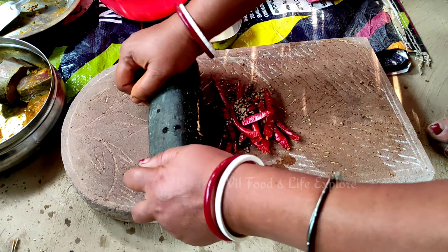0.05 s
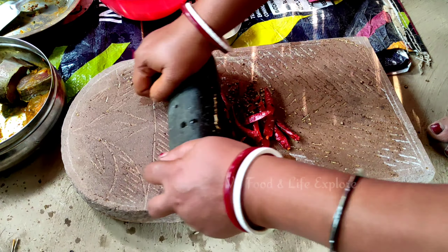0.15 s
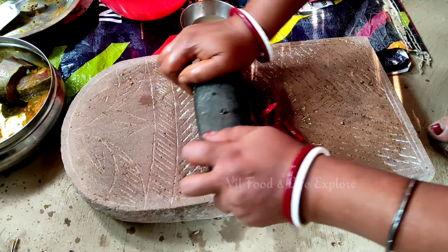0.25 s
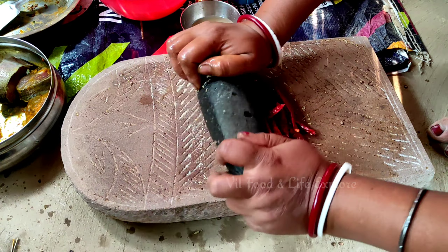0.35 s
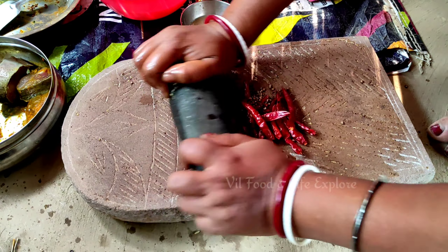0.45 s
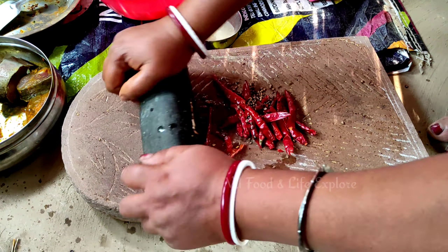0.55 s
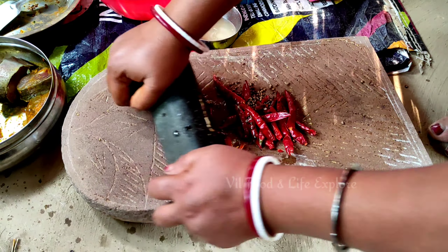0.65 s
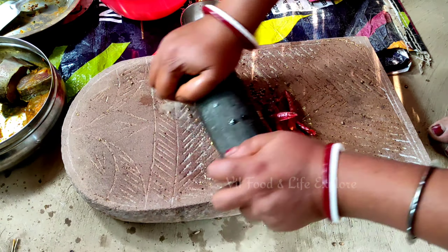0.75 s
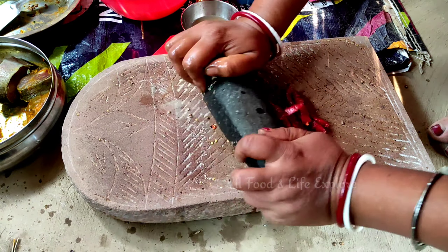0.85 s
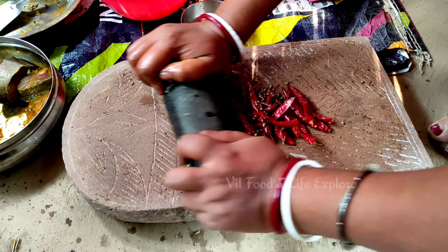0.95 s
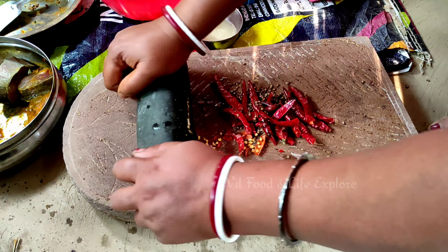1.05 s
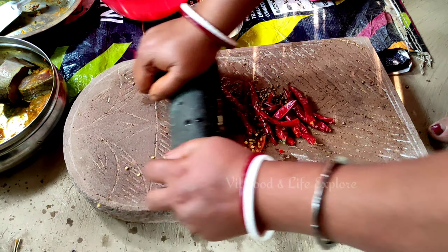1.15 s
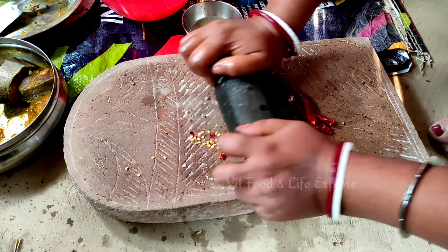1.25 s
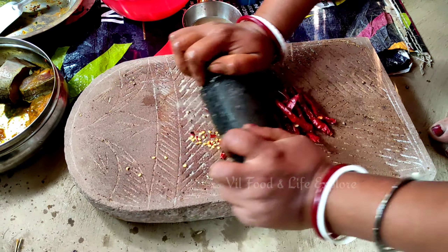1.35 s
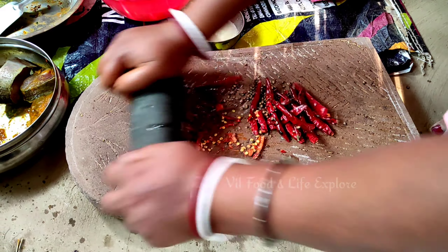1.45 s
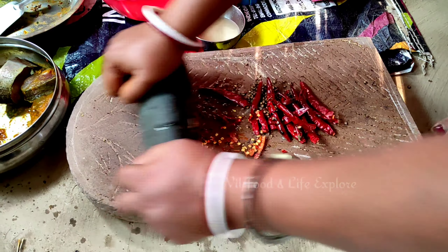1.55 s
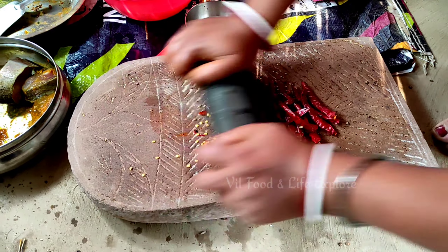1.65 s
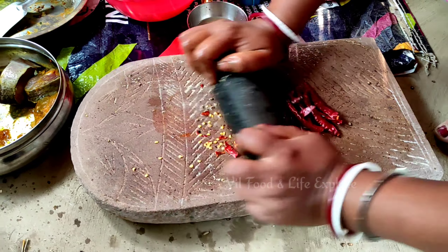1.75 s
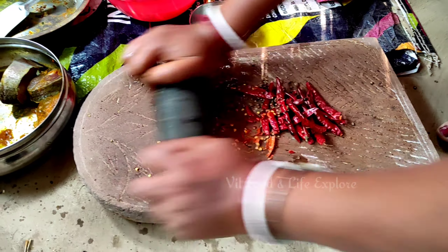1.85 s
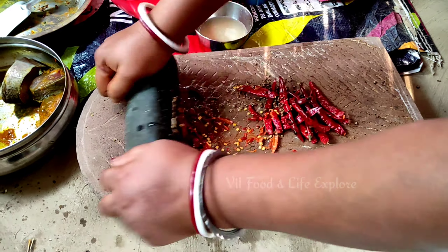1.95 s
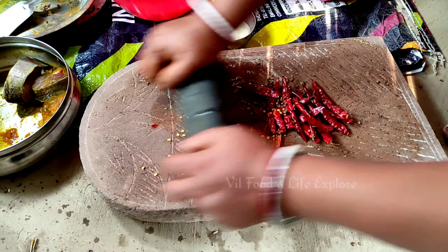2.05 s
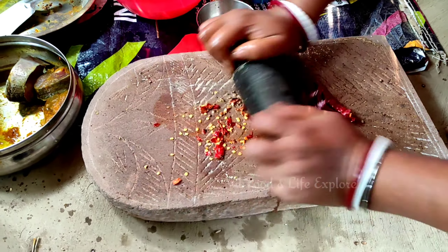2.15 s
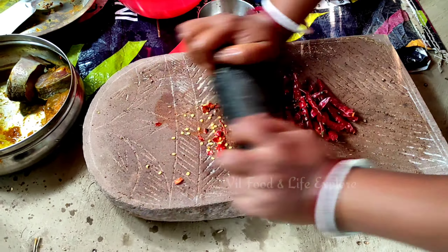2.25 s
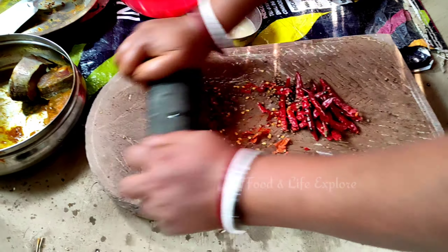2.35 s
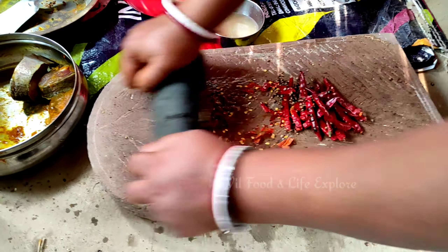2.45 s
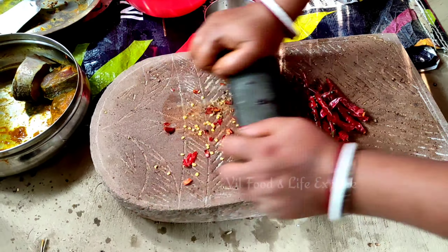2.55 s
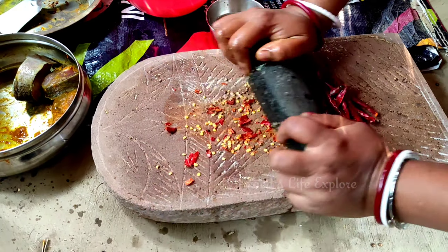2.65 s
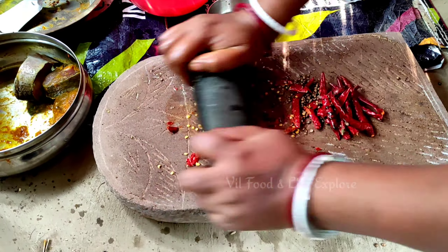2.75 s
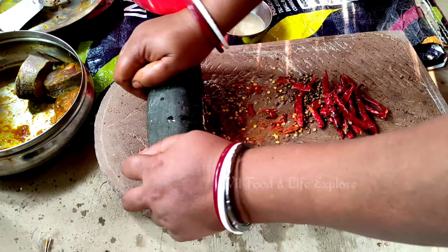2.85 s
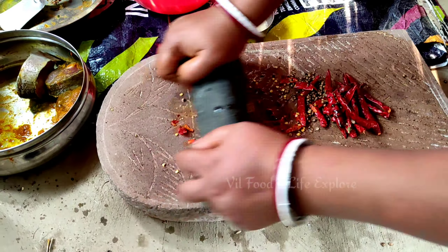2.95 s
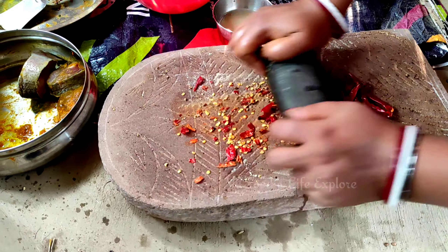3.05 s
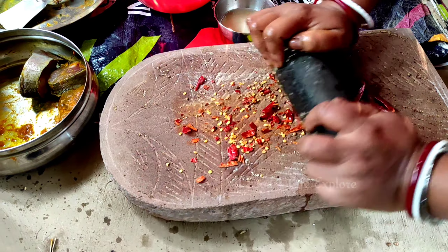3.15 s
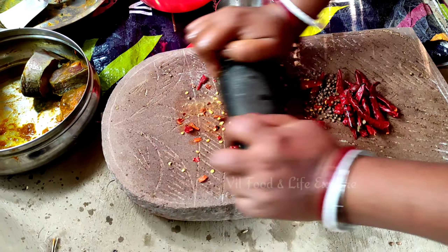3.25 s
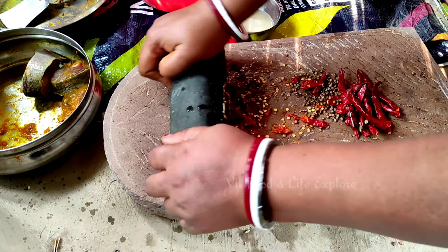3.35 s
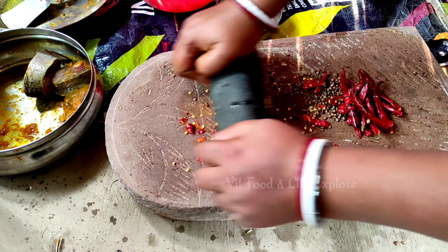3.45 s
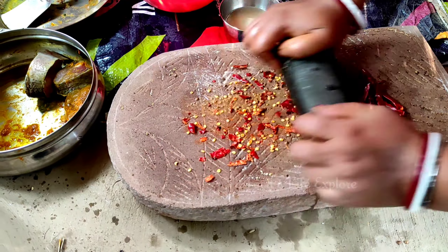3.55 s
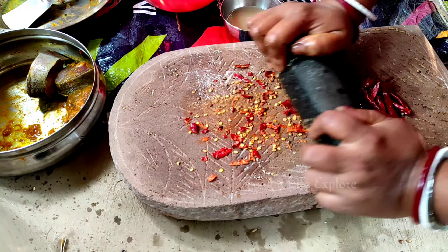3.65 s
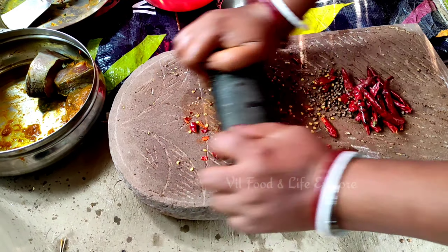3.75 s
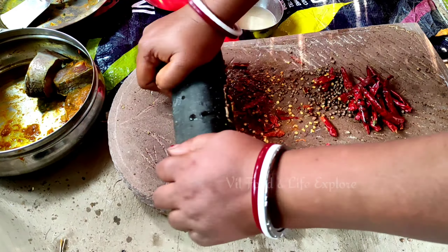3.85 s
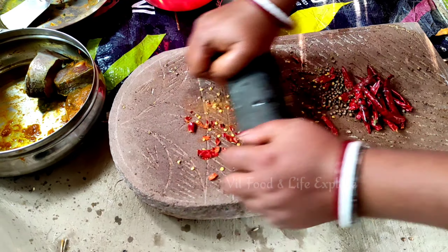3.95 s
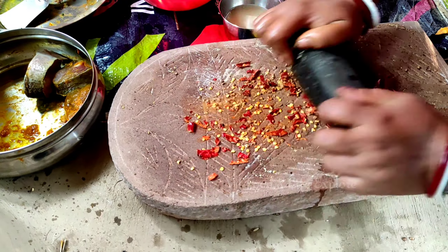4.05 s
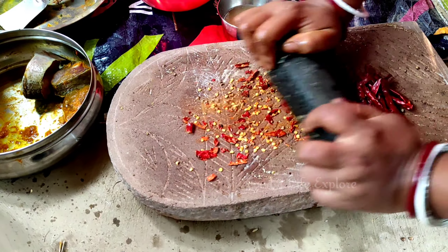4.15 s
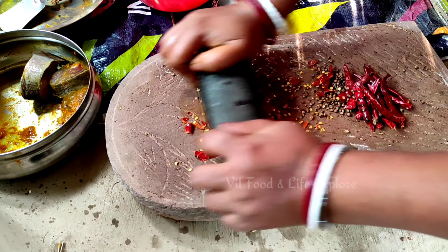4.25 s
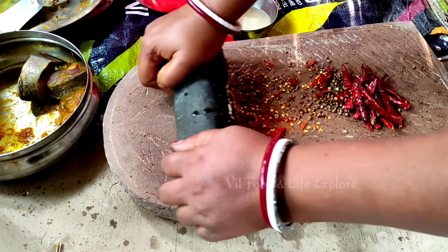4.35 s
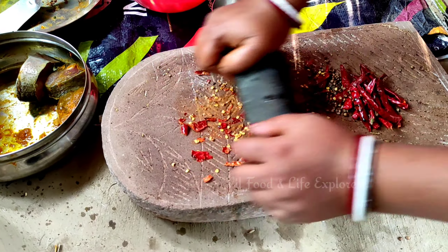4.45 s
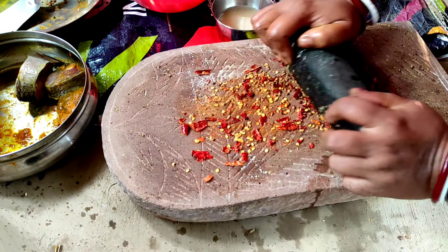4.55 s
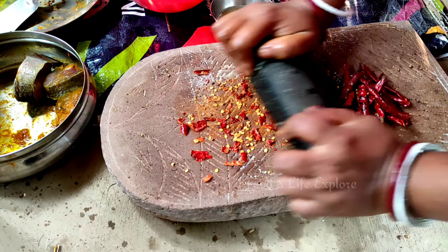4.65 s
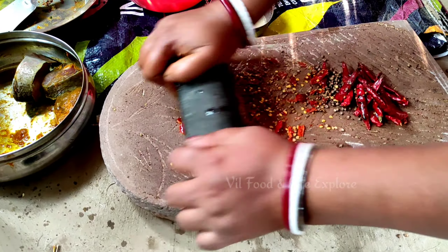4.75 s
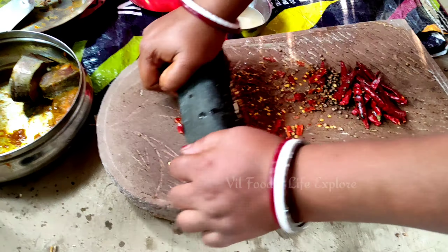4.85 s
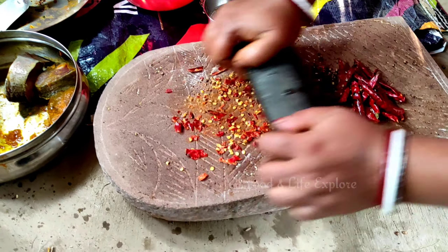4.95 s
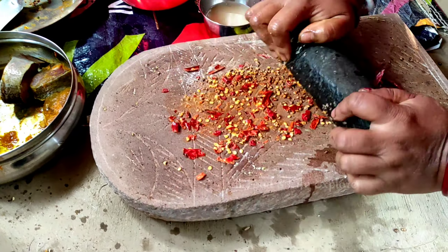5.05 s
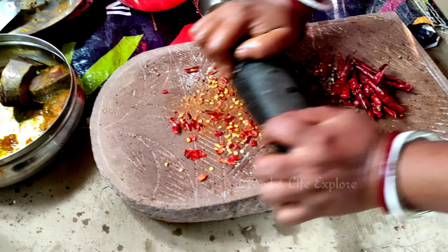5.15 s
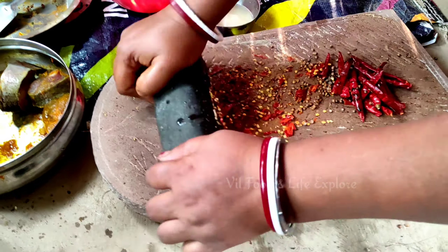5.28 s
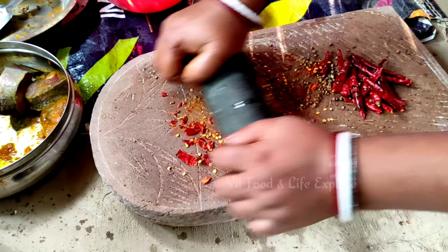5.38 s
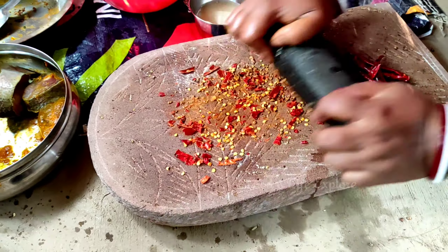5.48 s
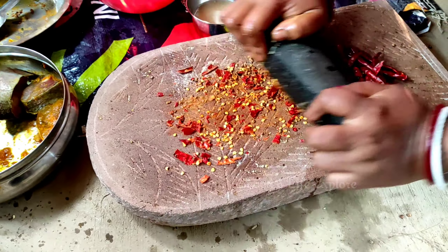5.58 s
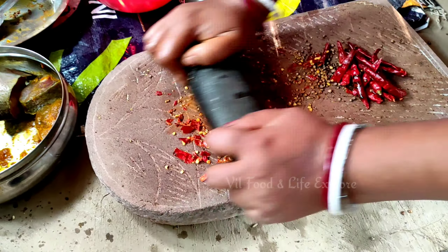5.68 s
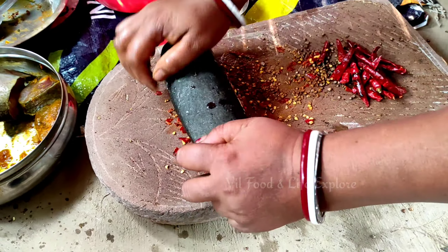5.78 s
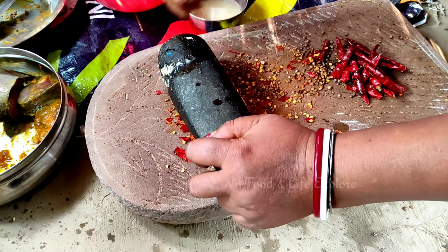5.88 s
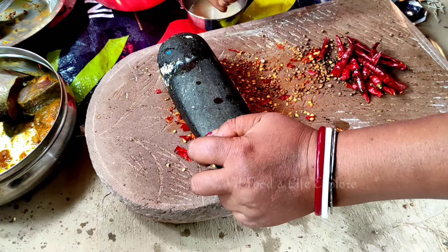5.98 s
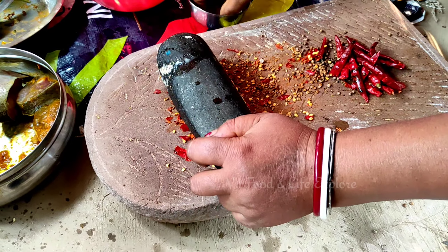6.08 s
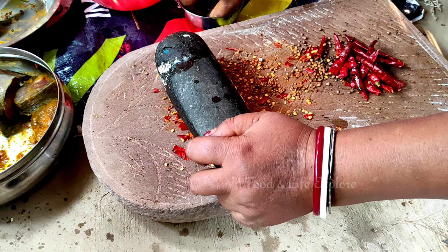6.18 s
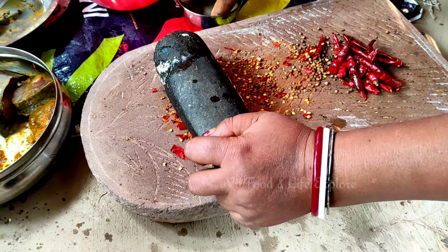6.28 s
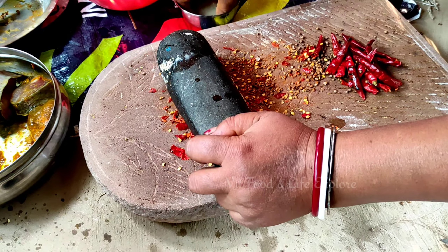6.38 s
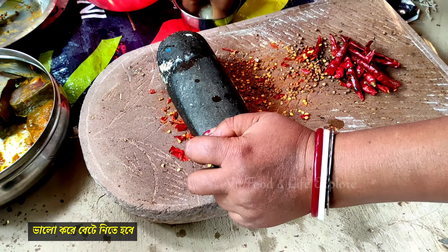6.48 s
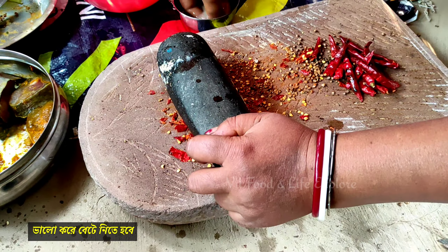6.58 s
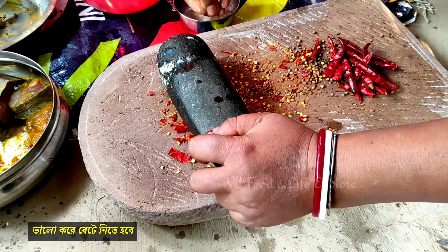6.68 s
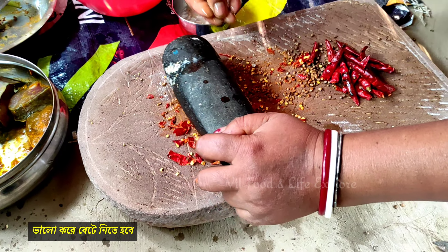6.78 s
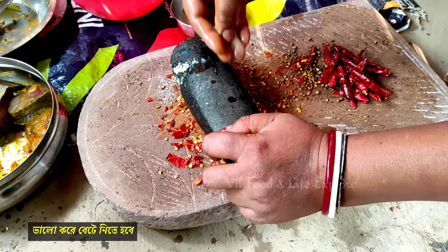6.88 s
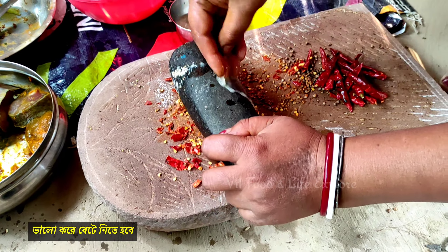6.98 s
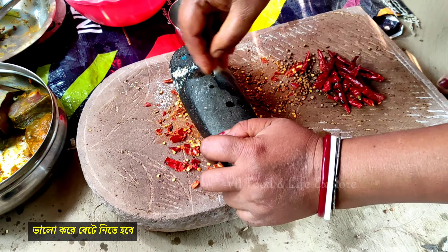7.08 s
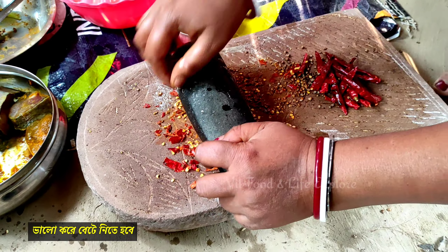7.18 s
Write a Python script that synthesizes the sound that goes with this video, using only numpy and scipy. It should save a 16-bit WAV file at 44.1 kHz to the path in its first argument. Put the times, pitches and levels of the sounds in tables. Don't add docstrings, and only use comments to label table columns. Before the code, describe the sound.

A stone roller scrapes and crackles back and forth over brittle pods on a slab, bangles clicking, until the quiet yard takes over with small wet sounds.

```python
import sys
import numpy as np
from scipy import signal
from scipy.fft import rfft, irfft
from scipy.io import wavfile
from scipy.ndimage import uniform_filter1d

SR = 44100
rng = np.random.default_rng(int(sys.argv[2]) if len(sys.argv) > 2 else 0)


def wrap_up_sound(samples):
    columns = np.atleast_2d(samples).T
    tamed = np.clip(columns, -1, 1)
    steps = np.round(tamed * 32767).astype(np.int16)
    wavfile.write(sys.argv[1], SR, steps)


def ratio_of_db(decibels):
    return 10 ** (np.asarray(decibels, float) / 20)


N = 318402
T = np.arange(N) / SR


def level(x):
    return x / np.sqrt(np.mean(x ** 2))


def colour(x, points, share=1):
    hz, db = np.transpose(points)
    grid = np.log(np.arange(1025) * SR / 2048 + 1)
    log_gain = share * np.interp(grid, np.log(hz), db) * np.log(10) / 20
    cepstrum = irfft(log_gain)
    cepstrum[1:1024] *= 2
    cepstrum[1025:] = 0
    impulse = irfft(np.exp(rfft(cepstrum)))
    return signal.oaconvolve(x, impulse[None], axes=1)[:, :N]


def fade(x, t60):
    return signal.lfilter([1], [1, -1000 ** (-1 / (max(t60, 1e-4) * SR))], x)


def ring(x, modes):
    out = 0
    for hz, db, t60 in modes:
        pole = np.exp(2j * np.pi * hz / SR - np.log(1000) / (t60 * SR))
        out = out + ratio_of_db(db) * signal.lfilter([0, pole.imag], [1, -2 * pole.real, abs(pole) ** 2], x)
    return out


def grains(per_s, scatter_db, t60):
    size = np.minimum(rng.exponential(size=N), 2.7)
    starts = (rng.random(N) < per_s / SR) * ratio_of_db(scatter_db * size)
    return np.sqrt(fade(starts ** 2, t60 / 2)) * rng.standard_normal((2, N))


def patchy(x, patchy_db):
    z = signal.stft(x, nperseg=256)[2]
    patch = uniform_filter1d(rng.standard_normal(z.shape), size=2, axis=1)
    patch = uniform_filter1d(patch, size=4, axis=2)
    return signal.istft(z * ratio_of_db(patchy_db * level(patch)), nperseg=256)[1][:, :N]


def swell(s, rise, fall, db, fall_db, shape):
    late = T[::64] - np.asarray(s)[:, None]
    building = -late / np.maximum(rise, .01)[:, None]
    easing = late / np.maximum(fall, .01)[:, None]
    off = np.where(late < 0, building, easing)
    power = ratio_of_db(np.asarray(db)[:, None] - fall_db * off ** shape) ** 2
    return np.interp(T, T[::64], np.sqrt(power.sum(axis=0)))


# (frequency [Hz], level [dB])
PORT_DIFFERENCE = [(40, -8), (110, -48.5), (380, -11), (700, -16.5), (1290, -1), (2380, -3), (4400, -11),
                   (8120, -1.5)]


def place(pair):
    return pair[0] + colour(pair[1:], PORT_DIFFERENCE) * np.array([[1], [-1]])


# (frequency [Hz], density [dB per Hz])
YARD_SPECTRUM = [(20, -1.5), (130, -9), (420, -26), (900, -20), (1090, -34.5), (8180, -22), (9700, -35.5),
                 (16000, -52)]
YARD_DB = -61


def yard():
    gust = level(uniform_filter1d(rng.standard_normal(N), 4000))
    air = level(colour(rng.standard_normal((2, N)), YARD_SPECTRUM))
    return place(air * ratio_of_db(YARD_DB + 1.8 * gust))


# (time [s], pitch [Hz], level [dB])
CROW = [
    (6.1, 590, -88),
    (6.35, 594, -76),
    (6.5, 597, -70),
    (6.62, 596, -73),
    (6.85, 596, -86),
]
# (multiple of the pitch, level [dB])
CROW_PARTIALS = [(1, -2), (2, -5), (3, 3)]
# (time [s], pitch [Hz], level [dB])
DOVE = [
    (7.015, 334, -77),
    (7.046, 340, -63),
    (7.124, 374, -66),
    (7.22, 378, -76),
]


def birds():
    out = np.zeros(N)
    waver = 1 + .006 * level(uniform_filter1d(rng.standard_normal(N), 900))
    for table, partials in ((CROW, CROW_PARTIALS), (DOVE, [(0.98, 0.0046)])):
        s, hz, db = np.transpose(table)
        phase = 2 * np.pi * np.cumsum(np.interp(T, s, hz) * waver) / SR
        tone = sum(ratio_of_db(g_db) * np.sin(k * phase) for k, g_db in partials)
        out += np.sqrt(2) * tone * ratio_of_db(np.interp(T, s, db, left=-120, right=-120))
    return out


# (time [s], pitch [Hz], level [dB])
WHINE = [
    (5.45, 973, -69),
    (5.85, 1018, -47.5),
    (6.314, 1121, -50),
    (6.856, 962, -50.5),
    (6.906, 938, -59),
    (7.22, 886, -61.5),
]


def whine():
    s, pitch, strength = np.transpose(WHINE)
    hz, db = np.interp(T, s, pitch), np.interp(T, s, strength)
    phase, high_phase = 2 * np.pi * np.cumsum(hz) / SR, 2 * np.pi * 2330 * T
    rough = level(uniform_filter1d(rng.standard_normal((4, N)), 330))
    tone = rough[0] * np.sin(phase) + rough[1] * np.cos(phase)
    tone += ratio_of_db(-7.0) * (rough[2] * np.sin(high_phase) + rough[3] * np.cos(high_phase))
    rush = level(ring(rng.standard_normal(N), [(1960, 0, 0.0026)]))
    low_rush = level(ring(rng.standard_normal(N), [(600, 0, 0.019)]))
    rush += 0.58 * low_rush * ratio_of_db(-54.5 - db)
    return ratio_of_db(db - 11.5) * (tone + ratio_of_db(-7.0) * rush)


# (time [s], level [dB], centre [Hz], width [Hz], t60 [s])
FIZZ = [
    (6.005, -47, 8400, 1200, 0.6),
    (6.001, -54, 4700, 800, 0.5),
    (6.066, -41.5, 7500, 700, 0.54),
    (6.141, -43, 7600, 810, 0.45),
    (6.45, -63, 7800, 2360, 1),
    (6.679, -47.5, 8200, 1700, 0.54),
    (6.677, -55, 4650, 750, 0.35),
]


def fizz():
    out, wet = np.zeros((2, N)), level(grains(330.0, 0.86, 0.046))
    for s, db, hz, width, t60 in FIZZ:
        bubble = [(hz, 0, 2.4 / width)]
        band = level(ring(ring(wet, bubble), bubble))
        rise = np.clip((T - s) / 0.0017, 0, 1)
        out += ratio_of_db(db) * band * rise * 1000 ** (-np.maximum(T - s, 0) / t60)
    return out


# (frequency [Hz], level [dB], t60 [s])
BANGLE_MODES = [(5850, -6, .05), (6880, 0, .06), (7430, 0, .05), (8215, 0, .06), (8590, 0, .06),
                (8965, 3, .07), (9588, 0, .07), (10850, -5, .04), (11400, -5, .04), (12230, -10, .05),
                (13070, -8, .06), (13900, -11, .04), (15000, -11, .05), (15330, -7, .06)]
SKIN_DAMPING = .65
TICK_EDGE = .68
SPIKE = 3.0


def snaps(table):
    out, t = np.zeros((2, N + SR)), T[:SR // 8]
    chance = rng.standard_normal((len(table), 2, len(t)))
    for (s, db, hz, *rattle), noise in zip(table, chance):
        sharp = noise + SPIKE * np.exp(-t / .0003) * np.cos(2 * np.pi * hz * t)
        crumbling = np.exp(-t / .0013) + .15 * np.exp(-t / .007)
        shell = [(hz, 0, min(8.1 / hz, .0028))]
        burst = ring(ring(sharp * crumbling, shell), shell)
        tick = noise * np.exp(-t / 0.0015)
        burst = burst / np.abs(burst).max() + 0.12 * tick
        if rattle:
            ring_db, rattle_s = rattle
            modes = [(f, g_db + 5.0 * e, SKIN_DAMPING * t60)
                     for (f, g_db, t60), e in zip(BANGLE_MODES, noise[0, ::-1])]
            clink = ring(noise * np.exp(-(t / max(rattle_s, .001)) ** 4.1), modes)
            burst += ratio_of_db(ring_db) * clink / np.abs(clink).max()
        edge = signal.butter(5, TICK_EDGE * min(hz, 7000), "high", fs=SR, output="sos")
        start = int(s * SR)
        out[:, start:start + len(t)] += ratio_of_db(db + 7.0) * signal.sosfilt(edge, burst)
    return out[:, :N]


# (time [s], peak [dB], ring [dB], rattle [s])
CLINKS = [(0.6444, -19.5, -11, 0.0034), (1.131, -16, -11, 0.0082), (1.599, -30, 0, 0.023),
          (1.865, -27, -28, 0.0088), (1.903, -29.5, 0, 0.0058), (2.0179, -32.5, 7, 0.0014),
          (2.0535, -16.5, -17, 0.0026), (2.115, -39.5, -3, 0.0028), (2.4943, -19.5, -8, 0.016),
          (2.949, -26, -2, 0.0097), (3.416, -18.5, -14, 0.0023), (3.444, -20.5, -6, 0.022),
          (3.903, -24, -28, 0.0069), (3.9303, -24, 2.5, 0.0018), (4.3911, -20.5, -19, 0.0026),
          (4.4006, -24.5, 0, 0.0053), (4.426, -27, -4, 0.0049), (4.8744, -19.5, -10.5, 0.028),
          (5.3525, -33, -0.5, 0.003), (5.356, -20, -0.5, 0.0018), (5.374, -33, 15, 0.019),
          (5.823, -26, 1.5, 0.0015), (5.846, -23, -0.5, 0.012), (5.897, -30, -2, 0.0097),
          (6.1883, -33.5, -9, 0.0063), (6.2175, -31, -6, 0.003),
          (0.6553, -32.5, 2, 0.002), (2.043, -27.5, -5.5, 0.0027), (2.105, -47.5, 5.5, 0.0049),
           (2.12, -34.5, 7, 0.0038), (2.961, -30.5, 2.5, 0.015), (3.0104, -32, 0, 0.0015),
           (3.021, -31.5, 1.5, 0.0031), (3.9354, -25, -7, 0.0038), (3.955, -34, -6, 0.005),
           (4.8662, -29.5, 7, .003), (4.8704, -45, 0.5, 0.0023), (4.89, -29, -8.5, 0.0075),
           (5.363, -32.5, -1.5, 0.003), (5.3802, -29, -4.5, 0.0023), (5.817, -35.5, 4, 0.0081),
           (5.839, -32, 4, 0.0052), (5.8305, -29.5, 5, 0.0039), (5.885, -41, 4, 0.0053)]


def bangles():
    return snaps([(s, db, 8600, *rattle) for s, db, *rattle in CLINKS])


# (time [s], peak [dB], centre [Hz])
CRACKS = [(0.2877, -35, 7850), (0.4609, -31, 7850), (0.4744, -28, 7340), (0.7708, -32, 8100),
          (0.9916, -43, 7200), (1.01, -32, 8450), (1.323, -23.5, 2680), (1.3326, -30.5, 2600),
          (1.4502, -16, 7900), (1.529, -23.5, 6100), (1.701, -31, 8040), (2.2523, -35, 8600),
          (2.3445, -21.5, 7400), (2.644, -34, 7800), (2.7929, -16, 7350), (2.8226, -30, 7400),
          (3.198, -23.5, 2940), (3.2266, -26, 7100), (3.662, -49, 7300), (4.2385, -18, 8600),
          (4.267, -13, 7060), (4.286, -21, 7600), (4.7087, -23.5, 7800), (4.7495, -27.5, 7260),
          (5.2235, -18.5, 7740), (4.2385, -29.5, 3760), (4.228, -30, 7700), (4.734, -22, 7350),
          (4.7461, -14, 7200), (5.135, -30, 2780), (5.2015, -16, 8170), (5.2204, -17.5, 7000),
          (5.674, -20, 7260), (7.0786, -42.5, 3160), (7.0788, -41, 7020),
          (0.467, -30, 7600), (0.505, -26.5, 6940), (0.52, -31, 7200), (0.86, -47, 7700),
             (1.22, -35.5, 8340), (1.427, -41, 7400), (1.5874, -29, 7060), (1.722, -34, 2640),
             (1.793, -26, 7300), (1.809, -25, 7300), (1.878, -36.5, 2760), (1.923, -30, 7600),
             (2.755, -33.5, 7200), (2.806, -32, 5100), (3.199, -34, 7000), (3.306, -21, 7300),
             (3.5816, -29, 8100), (3.755, -39, 8050), (3.782, -18, 7150), (4.054, -35, 8300),
             (4.318, -30, 7540), (4.539, -45, 7600), (4.785, -20, 7300), (4.905, -40.5, 7460),
             (5.0958, -29, 7840), (5.324, -23.5, 7500), (5.634, -22.5, 7600), (5.695, -25, 6950),
             (0.1008, -39, 2530), (0.2913, -36.5, 2340), (0.3214, -47, 2470), (.8659, -50.5, 2320),
             (1.903, -29.5, 3600), (2.3406, -40.5, 2520), (3.2991, -33, 3020), (4.1666, -40, 2310),
             (4.6505, -38.5, 2700), (0.278, -51, 7700), (0.9788, -40, 8200), (1.941, -26, 8700),
             (2.6214, -47, 8200), (3.3403, -27, 7340), (5.521, -29, 7800), (5.68, -38, 4400),
             (5.75, -18.5, 7700)]


def cracks():
    return snaps(CRACKS)


# (frequency [Hz], level [dB], t60 [s])
SLAB = [(937, 0, .05), (732, -12, .06), (1090, -9, .04), (620, -14, .03)]
# (frequency [Hz], level [dB], t60 [s])
SLAB_UPPER = [(1250, 4, 0.019), (1450, -3.5, 0.093), (1724, -1, 0.049), (1996, 2, 0.073), (2150, 5, 0.01),
              (2610, 2, 0.09)]


def strike_slab(table):
    out, t = np.zeros((2, N + SR)), T[:SR // 5]
    chance = rng.standard_normal((len(table), 2, len(t)))
    for (s, db, hz, t60, upper_db), noise in zip(table, chance):
        t60 = np.clip(t60, .02, .075)
        slide = t + 0.00029 * (1 - np.exp(-t / 0.0044))
        push = t * np.exp(-t / 0.0015) * (np.sin(2 * np.pi * hz * slide) + 1.3 * noise) + 1e-18
        local = [(hz, 0, t60), (.55 * hz, 1, .012), (.65 * hz, 3, .012), (1.3 * hz, 5, .012)]
        spot = ring(push, local) + ratio_of_db(-6) * ring(push, SLAB)
        modes = [(f, g_db + 5.0 * e, d) for (f, g_db, d), e in zip(SLAB_UPPER, noise[0, ::-1])]
        upper = ring(push, modes)
        chatter = ring(ring(noise * np.exp(-t / .009), [(1500, 0, .001)]), [(2300, 0, .001)])
        upper = upper / np.abs(upper).max() + .8 * chatter / np.abs(chatter).max()
        blow = spot / np.abs(spot[0]).max() + ratio_of_db(upper_db + 2.0) * upper
        start = int(s * SR)
        out[:, start:start + len(t)] += ratio_of_db(db - 0.5) * blow
    band = signal.butter(3, [330, 3100], "band", fs=SR, output="sos")
    return place(signal.sosfilt(band, out[:, :N]) * np.array([[1], [.8]]))


# (time [s], peak [dB], pitch [Hz], t60 [s], upper modes [dB])
KNOCKS = [(0.044, -39, 423, 0.052, -27), (0.203, -34.5, 940, 0.085, -14), (0.563, -16, 982, 0.043, -8.5),
          (0.594, -23, 1017, 0.016, -12.5), (1.131, -21, 733, 0.044, -28), (1.215, -35.5, 890, 0.034, -43),
          (1.2325, -15, 946, 0.052, -8), (1.273, -17, 988, 0.055, -5), (1.588, -24.5, 836, 0.09, 7),
          (1.649, -28, 900, 0.017, -12), (1.691, -29.5, 912, 0.023, -18), (2.034, -18, 738, 0.12, -2.5),
          (2.051, -27, 730, 0.11, -13), (2.208, -24.5, 950, 0.064, -12), (2.221, -21, 980, 0.051, -4.5),
          (2.478, -32.5, 600, 0.017, -9.5), (2.609, -29, 864, 0.015, -19), (2.849, -27.5, 958, 0.06, -32),
          (3.23, -25, 978, 0.017, -10), (4.188, -37.5, 1010, 0.016, -4.5), (4.288, -28.5, 936, .03, -20),
          (6.195, -53, 1040, 0.055, 3), (6.797, -60.5, 943, 0.055, 7), (7.002, -57, 1520, 0.024, 3),
          (0.607, -30.5, 963, 0.017, -10.5), (0.709, -41, 514, 0.025, -18), (0.745, -37.5, 945, 0.037, -16),
        (1.011, -39, 940, 0.02, -8), (1.132, -22, 1050, 0.016, -10.5), (1.677, -38, 538, 0.037, -19),
        (1.906, -36.5, 930, 0.018, -13), (2.487, -36, 720, 0.059, -27), (2.599, -42.5, 860, 0.032, -13),
        (2.795, -33.5, 1010, 0.018, -12), (3.12, -43, 940, 0.017, 2), (3.329, -31, 922, 0.096, -42),
        (3.785, -41, 980, 0.02, -18), (4.238, -40, 920, .02, -27), (4.254, -36, 940, 0.017, -17),
        (4.74, -28.5, 970, 0.047, -23), (5.203, -34, 940, 0.027, -5.5), (5.223, -29.5, 926, 0.016, -20),
        (5.294, -40.5, 884, 0.017, -30), (5.734, -31.5, 956, 0.046, -23)]
# (time [s], peak [dB], pitch [Hz])
BUMPS = [(.454, -36, 937), (.998, -42, 965), (1.45, -40, 980), (2.341, -40, 956), (2.411, -34.5, 924),
         (2.489, -39.5, 500), (2.815, -36.5, 950), (3.772, -41, 980), (4.037, -41.5, 494),
         (4.554, -40, 931), (4.693, -38.5, 960), (4.716, -36.5, 930), (4.781, -42, 939), (4.999, -43, 974),
         (5.13, -35, 920), (5.266, -43.5, 950), (5.555, -35, 940), (5.613, -34.5, 924), (5.676, -40, 960),
         (5.718, -33.5, 928), (5.777, -38, 900), (6.461, -55.5, 950), (6.616, -52, 1040)]
BUMP_T60_S, BUMP_UPPER_DB = 0.058, -16.5


def knocks():
    bumps = [(*bump, BUMP_T60_S, BUMP_UPPER_DB) for bump in BUMPS]
    return strike_slab(KNOCKS + bumps)


# (time [s], rumble [dB])
ROLLING = [(.06, -73), (0.571, -53.5), (.83, -54), (1.04, -47.5), (1.13, -51.5), (1.28, -54.5),
           (1.5, -43.5), (1.68, -49.5), (1.943, -43.5), (2.209, -48.5), (2.403, -43.5), (2.638, -48.5),
           (2.869, -41.5), (3.122, -45), (3.391, -48), (3.63, -48.5), (3.87, -43.5), (4.1, -45),
           (4.378, -46), (4.59, -48), (4.837, -46.5), (5.06, -46), (5.301, -42.5), (5.577, -45),
           (5.79, -46.5)]
SPEED_UP_S, SLOW_DOWN_S, RUMBLE_FALL_DB = 0.12, 0.14, 19.5
# (time [s], soft rub [dB])
ROCKING = [(0.07, -59), (0.23, -48), (0.591, -51.5), (0.764, -46.5), (1.25, -51), (1.665, -45.5),
           (1.91, -59), (2.053, -48), (2.221, -56), (2.48, -53.5), (2.849, -53)]
ROCK_IN_S, ROCK_OUT_S, ROCK_FALL_DB, RUB_DB = 0.064, 0.087, 25.5, -16.5
# (frequency [Hz], density [dB per Hz])
RUMBLE_SPECTRUM = [(25, -49), (85, -3.5), (118, 4), (145, -8.5), (188, 3.5), (250, -10), (320, -13),
                   (800, -45.5)]
# (frequency [Hz], density [dB per Hz])
RUB_SPECTRUM = [(200, -40), (380, -1), (560, 0), (800, -9), (1200, -6), (2500, -45)]
ROUND = 2.13


def rolling():
    s, db = np.transpose(ROLLING)
    speed_up, slow_down = np.full_like(s, SPEED_UP_S), np.full_like(s, SLOW_DOWN_S)
    speed = swell(s, speed_up, slow_down, db, RUMBLE_FALL_DB, ROUND)
    s, db = np.transpose(ROCKING)
    rock_in, rock_out = np.full_like(s, ROCK_IN_S), np.full_like(s, ROCK_OUT_S)
    rocking = swell(s, rock_in, rock_out, db, ROCK_FALL_DB, ROUND)
    rub = level(colour(grains(700., 3.7, 0.0054), RUB_SPECTRUM))
    rumble = level(colour(grains(370.0, 5.8, 0.085), RUMBLE_SPECTRUM))
    return place(rub * (rocking + ratio_of_db(RUB_DB) * speed) + rumble * speed)


# (hardest time [s], build-up [s], let-off [s], grit [dB])
STROKES = [(0.081, 0.18, 0.3, -53), (0.306, 0.054, 0.46, -42.5), (0.471, 0.093, 0.14, -32.5),
           (0.64, 0.47, 0.042, -52), (0.789, 0.14, 0.18, -71), (0.92, 0.27, 0.086, -38.5),
           (1.01, 0.073, 0.13, -33.5), (1.319, 0.15, 0.15, -38.5), (1.496, 0.15, 0.12, -30.5),
           (1.781, 0.16, 0.11, -36.5), (1.949, 0.16, 0.091, -32), (2.21, 0.15, 0.35, -39),
           (2.378, 0.11, 0.2, -32.5), (2.654, 0.099, 0.46, -37.5), (2.804, 0.088, 0.32, -33.5),
           (3.1, 0.1, 1, -40.5), (3.338, 0.11, 0.14, -25), (3.662, 0.14, 0.11, -33.5),
           (3.815, 0.17, 0.16, -29.5), (4.121, 0.12, 0.15, -36.5), (4.27, 0.06, 0.2, -26.5),
           (4.59, 0.15, 0.32, -37), (4.775, 0.12, 0.16, -27), (5.063, 0.13, 1, -39.5),
           (5.268, 0.097, 0.17, -29), (5.569, 0.12, 0.19, -34), (5.764, 0.26, 0.18, -31.5)]
# (husk crunch [dB], slab hum [dB])
STROKE_WEIGHT = [(-57, -77), (-47.5, -50), (-42.5, -57), (-73, -51.5), (-53.5, -49), (-46, -51),
                 (-45, -49.5), (-41, -50), (-40.5, -48), (-44, -55.5), (-43.5, -47), (-48, -54.5),
                 (-45, -48.5), (-48.5, -50.5), (-47, -51.5), (-51.5, -53), (-43, -37.5), (-45.5, -47.5),
                 (-43, -42.5), (-49.5, -49), (-42.5, -39), (-52.5, -52), (-45.5, -41.5), (-55, -51.5),
                 (-49.5, -46), (-52, -48), (-50, -47.5)]
# (frequency [Hz], density [dB per Hz])
GRIT_SPECTRUM = [(2060, -29.5), (4420, -12), (6240, -5.5), (7480, -4), (8910, -6.5), (9880, -19.5),
                 (15000, -31), (16500, -60.5)]
# (frequency [Hz], density [dB per Hz])
HUSK_SPECTRUM = [(300, -35), (600, -31.5), (1200, -5.5), (1630, -6), (2600, 2), (3500, -1), (5000, -6),
                 (8000, -50.5)]
GRIT_FALL_DB, HUSK_FALL_DB, HUM_FALL_DB = 29, 26, 35
CREST = 1.56


def crushing():
    s, rise, fall, grit_db = np.transpose(STROKES)
    husk_db, hum_db = np.transpose(STROKE_WEIGHT)
    grit = level(colour(patchy(grains(750., 2.1, 0.035), patchy_db=5.0), GRIT_SPECTRUM))
    husk = level(colour(patchy(grains(500., 1.0, 0.032), patchy_db=3.5), HUSK_SPECTRUM))
    hum = level(ring(grains(500., 3.5, 0.014), [(941.0, 0.5, 0.12), (998, -0.074, 0.054)]))
    grit = grit * swell(s, rise, fall, grit_db, GRIT_FALL_DB, CREST)
    husk = husk * swell(s, rise, fall, husk_db, HUSK_FALL_DB, CREST)
    hum = hum * swell(s, rise, fall, hum_db, HUM_FALL_DB, CREST)
    return place(grit + husk + hum)


def reflections(near):
    tail = rng.standard_normal((2, SR // 3)) * 1000 ** (-T[:SR // 3] / 0.065)
    tail[:, :130] = 0
    return ratio_of_db(-28.5) * signal.oaconvolve(near, tail, axes=1)[:, :N]


def scene():
    near = crushing() + rolling() + knocks() + cracks() + bangles() + fizz()
    return near + reflections(near) + birds() + whine() + yard()


# (frequency [Hz], difference [dB])
PORT_BALANCE = [(60, 5), (250, 5.5), (2000, 0.5), (6200, -3), (7400, -13), (8400, 9.5), (10400, 7),
                (15200, 2)]


def microphone_ports(dry):
    left = np.roll(colour(dry[:1], PORT_BALANCE, share=.5), shift=3)
    right = colour(dry[1:], PORT_BALANCE, share=-.5)
    top_cut = signal.butter(16, 15700, fs=SR, output="sos")
    return signal.sosfilt(top_cut, np.vstack([left, right]))


# (frequency [Hz], rounding step over band level [dB])
COARSE = [(700, -21), (1700, -5), (3400, .5), (5200, -3), (7400, -12), (9800, .5), (15000, 5), (16600, 25)]
# (frequency [Hz], threshold [spreads above the mean])
GAPS = [(1000, 3), (1600, 1.6), (2600, 1.2), (3700, .5), (5000, .85), (7500, 2.1), (9600, .9), (15000, .3)]
COARSE_SCATTER_DB, CLICK_DB = 5, 9
FAINT_HZ, FAINT_DB = 9700, -63


def masked_rounding(x):
    half, lead = 1024, 2048 - 597
    mix = np.array([[1, 1], [1, -1]]) / np.sqrt(2)
    n, k = np.arange(2 * half), np.arange(half)
    window = signal.windows.kaiser_bessel_derived(2 * half, 4 * np.pi)[:, None]
    cosines = np.cos(np.pi / half * np.outer(n + (half + 1) / 2, k + .5))
    basis = window * cosines * np.sqrt(2 / half)
    end = 2 * half - (lead + N) % half
    halves = np.pad(mix @ x, ((0, 0), (lead, end))).reshape(2, -1, half)
    frames = np.concatenate([halves[:, :-1], halves[:, 1:]], axis=2)
    bins = frames @ basis
    bin_hz, log_hz = k * SR / 2 / half, np.log((k + 1) * SR / 2 / half)
    hz, db = np.transpose(COARSE)
    scatter = level(uniform_filter1d(rng.standard_normal(bins[..., ::8].shape), size=2, axis=1))
    scatter_db = COARSE_SCATTER_DB * np.repeat(scatter, 8, axis=2)
    around = np.sqrt(uniform_filter1d(np.mean(bins ** 2, axis=0), size=40, axis=1) + 1e-18)
    step = around * ratio_of_db(np.interp(log_hz, np.log(hz), db) + scatter_db)
    step = np.maximum(step, (bin_hz > FAINT_HZ) * ratio_of_db(FAINT_DB + scatter_db))
    steps = np.floor((np.abs(bins) / step) ** .75 + .4054)
    rounded = np.sign(bins) * step * steps ** (4 / 3)
    hz, spreads = np.transpose(GAPS)
    chance = level(uniform_filter1d(rng.standard_normal(bins[..., ::8].shape), size=4, axis=1))
    kept = np.repeat(chance, 8, axis=2) < np.interp(log_hz, np.log(hz), spreads)
    slope = np.diff(frames[0], prepend=0).reshape(len(bins[0]), 16, -1)
    blocks = np.sqrt(np.mean(slope ** 2, axis=2))
    click = blocks[:, 3:13].max(axis=1) > ratio_of_db(CLICK_DB) * np.median(blocks, axis=1)
    frames = np.where(click[:, None], bins, rounded * kept) @ basis.T
    halves = frames[:, 1:, :half] + frames[:, :-1, half:]
    return mix @ halves.reshape(2, -1)[:, lead - half:lead - half + N]


def low_pass(x):
    return signal.sosfilt(signal.butter(12, 16700, fs=SR, output="sos"), x)


def record(dry):
    mix = masked_rounding(microphone_ports(dry))
    return low_pass(mix)


dry = scene()
out = record(dry)
wrap_up_sound(out)
```